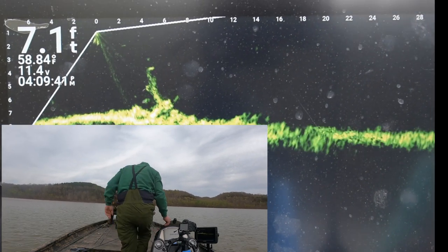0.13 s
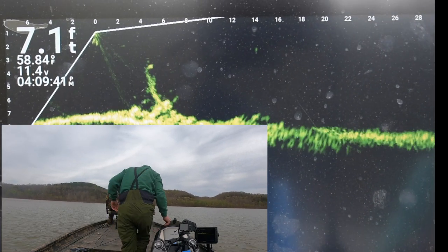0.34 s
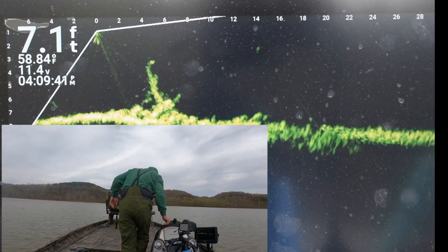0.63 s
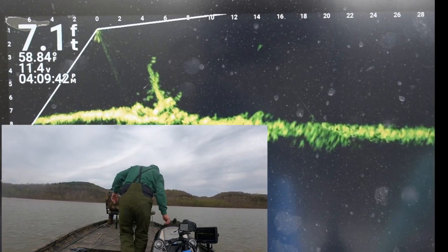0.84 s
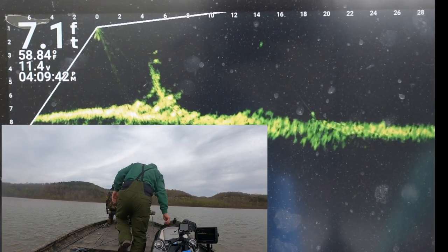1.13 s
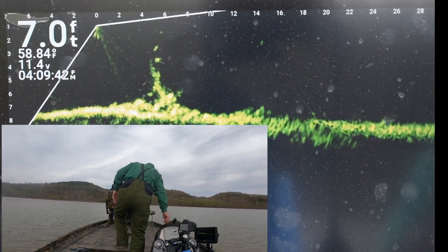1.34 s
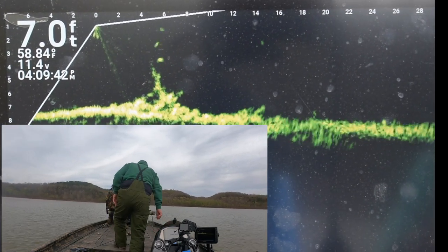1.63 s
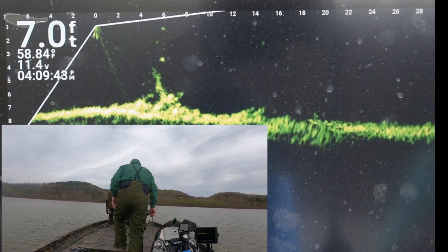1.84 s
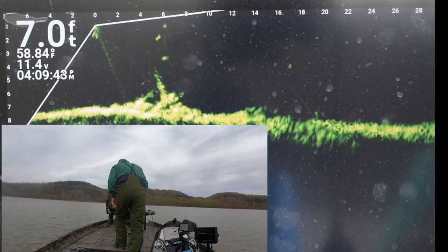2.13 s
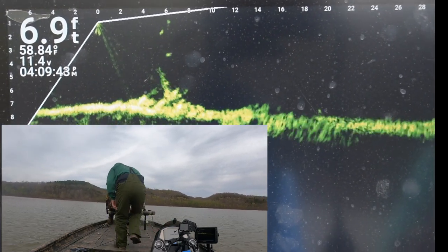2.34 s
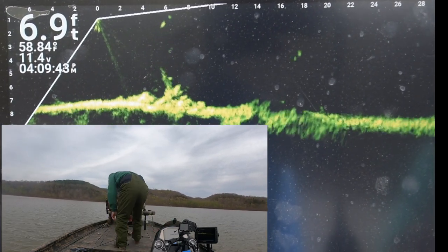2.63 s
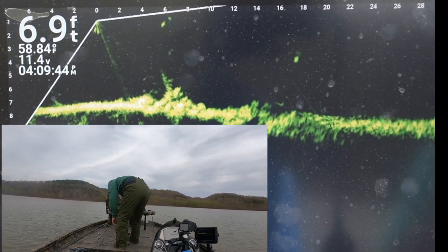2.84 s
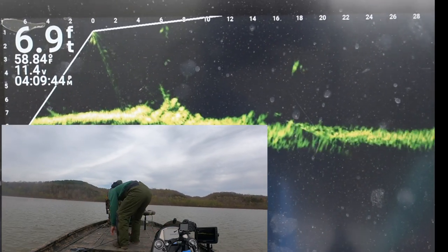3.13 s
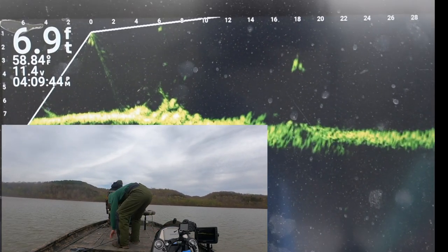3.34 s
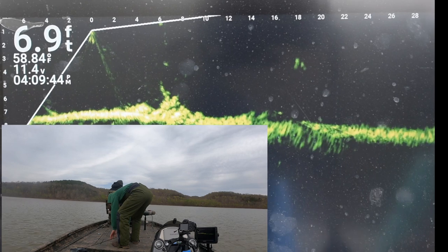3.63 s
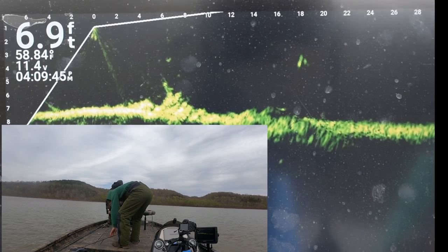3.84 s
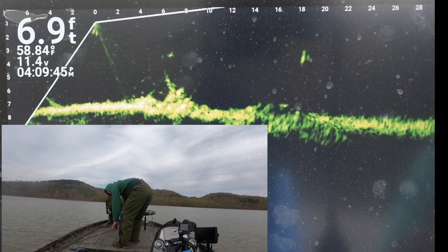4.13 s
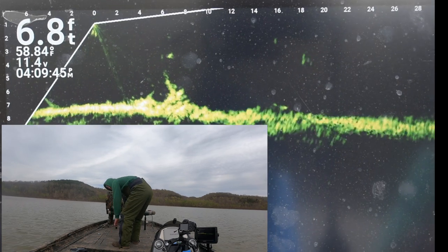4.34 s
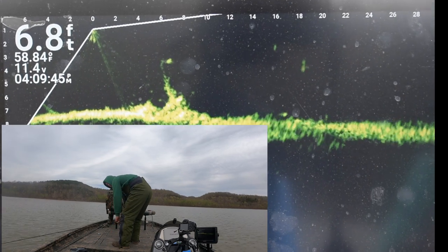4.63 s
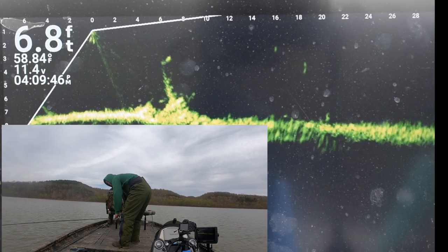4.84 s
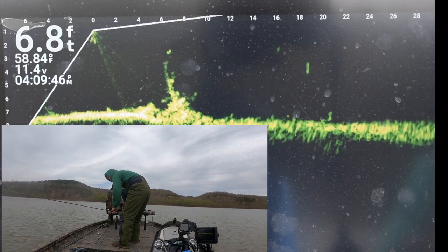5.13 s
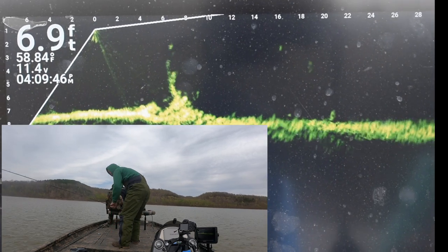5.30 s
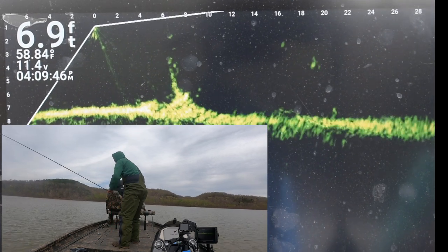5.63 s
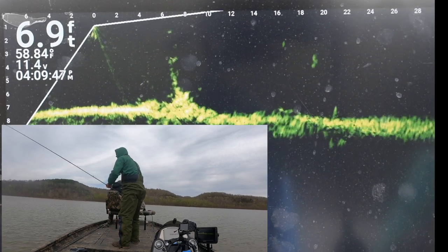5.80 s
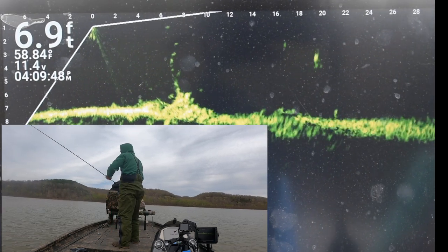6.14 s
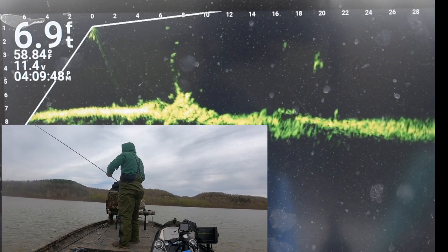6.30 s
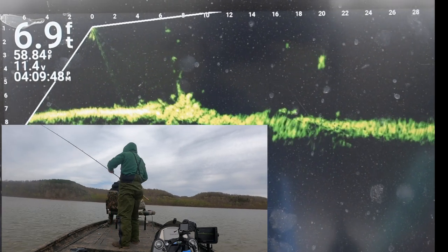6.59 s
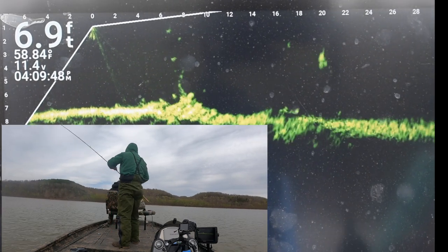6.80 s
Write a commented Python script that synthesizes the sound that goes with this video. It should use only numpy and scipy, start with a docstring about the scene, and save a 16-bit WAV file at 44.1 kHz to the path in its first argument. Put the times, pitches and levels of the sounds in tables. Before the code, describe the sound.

Irregular footsteps and handling on a boat deck, heard from a few steps behind. Early on there are solid hollow thuds, gritty scuffs, rattling gear and crisp swishes of rain clothes. After a loud step around 2.8 seconds the movement calms to sparse woody knocks and ticks, with light thumps returning late. Wind rumbles, flutters and puffs unevenly in low thuds on the microphone, slightly heavier on the left; water and hiss are barely audible.

```python
"""Boots thump the hollow deck of a small boat on a lake as an angler walks and rummages, the microphone behind him.
Shaped noise pushes ring deck, hull and hatch lids; bumpy scrapes through single resonances make tackle knock and tick.
Grainy noise strokes make rain gear rustle and blows click brightly; soles scuff and grit crackles under it.
Gusting wind buffets and flutters on the two ports; the lake lies wide and steady behind, over faint microphone hiss."""
import sys
import numpy as np
from scipy import signal
from scipy.fft import rfft, irfft
from scipy.io import wavfile
from scipy.ndimage import uniform_filter1d

SR = 44100
rng = np.random.default_rng(int(sys.argv[2]) if len(sys.argv) > 2 else 0)


def materialize(psi):
    """Save the field psi as 16-bit PCM at rate SR to the path in sys.argv[1].

    A 1-D psi becomes a single channel; in a 2-D psi each row is a channel.
    """
    bounded = np.clip(np.atleast_2d(psi).T, -1, 1)
    quanta = np.round(bounded * 32767).astype(np.int16)
    wavfile.write(sys.argv[1], SR, quanta)


N = 306936  # samples

# Boots on the deck: (time [s], thump level [dB], knock level [dB over thump], grit level [dB over thump],
# weight on the hull [dB over thump], contact [s], loudest panel [Hz])
STEPS = [(0.417, -15, -15, -23.5, -32, 0.021, 143), (0.464, -25, -40, -25, 11, 0.015, 120),
         (0.481, -30.5, 1.5, -2, -1, 0.012, 152), (0.71, -34, -6.5, -35, -12, 0.027, 432),
         (0.93, -25.5, -10, -7.5, -2.5, 0.015, 238), (1.089, -39.5, -24, -7, 2, 0.012, 253),
         (1.763, -15, -8.5, -24.5, -25, 0.012, 221), (1.939, -21, -5.5, -8.5, -15, 0.013, 250),
         (2.028, -41.5, -24, -12, 6, 0.0092, 123), (2.843, -13, -12.5, -18.5, -0.5, 0.018, 126),
         (5.643, -29, -12, -23, 0, 0.015, 247), (5.669, -35, -25, -35, -6, 0.018, 218),
         (6.171, -26.5, -24, -35, -12, 0.011, 176), (6.197, -33, -23, -40, 0, 0.015, 230),
         (6.414, -37, 1, -37, 8, 0.0084, 121), (6.722, -29, -25, -40, -4, 0.015, 252)]
# Ringing modes of deck panels, hull and hatch lids: (frequency [Hz], relative level [dB], t60 [s])
DECK_MODES = [(131, 6, 0.024), (149.4, -4.5, 0.13), (185, -7, 0.03), (225, 5, 0.079), (251.6, -6.5, 0.2),
              (320, -5, .045), (382, -1.5, 0.08), (458, -6.5, 0.078)]
HULL_MODES = [(45.4, -7, 0.3), (64.1, -4.5, 0.2), (77.2, -19, 0.5)]
HATCH_MODES = [(520, 9.5, 0.014), (616, 10, 0.022), (692, 2, 0.068), (902, 8, 0.019), (1048, 4, 0.039),
               (1248, 8, 0.014), (1510, 0, 0.043), (2150, -17, 0.011)]
# Sand crushed under the sole, noise spectrum: (frequency [Hz], relative level [dB per Hz])
GRIT_SPECTRUM = [(900, -7), (1500, 7), (2500, 9), (4000, 3), (5500, -11), (8000, -6.5), (10000, -20),
                 (15000, -34)]
PANEL_DB, PANEL_T60_S = 4.5, 0.074  # the panel right under the boot

# Lids, tackle, rods and snaps knocked; low rings are hollow, high ones tick:
# (time [s], level [dB], ring [Hz], width [octaves], contact [s])
GEAR = [(0.2556, -54, 1830, 1.3, 0.029), (0.2817, -47.5, 2820, 0.69, 0.016),
        (0.417, -40.5, 3300, 1.1, 0.012), (0.44, -35.5, 915, 1.7, 0.0091), (0.4811, -34, 3700, 0.6, 0.006),
        (0.672, -42, 437, 0.3, 0.052), (0.692, -37, 480, 1.2, 0.013), (0.714, -29.5, 403, 1.14, 0.0093),
        (0.753, -43, 404, 2.3, 0.018), (0.758, -44.5, 3020, 1, 0.0052), (0.7745, -40.5, 1780, 0.46, 0.012),
        (0.789, -43, 3860, 0.8, 0.0037), (0.803, -37.5, 510, 0.9, 0.012), (0.856, -35.5, 690, 0.56, 0.0057),
        (0.8754, -45, 2340, 0.36, 0.041), (0.9162, -31, 4200, 0.79, 0.0045),
        (0.917, -34.5, 1260, 1.2, 0.0094), (0.929, -24, 593, 0.71, 0.0054), (0.955, -45, 696, 1.4, 0.012),
        (1.054, -43.5, 1740, 0.52, 0.012), (1.055, -40.5, 3950, 0.49, 0.0054),
        (1.075, -35, 696, 0.85, 0.0091), (1.1608, -48, 1250, 0.86, 0.067), (1.2187, -41, 1470, 1.5, 0.017),
        (1.3441, -38, 1190, 0.84, 0.022), (1.3864, -49.5, 3198, 0.33, 0.0038),
        (1.744, -32.5, 640, 0.53, 0.015), (1.7986, -42, 1900, 0.46, 0.01), (1.799, -40, 606, 1.2, 0.028),
        (1.94, -30.5, 3670, 1.3, 0.0051), (1.9694, -42.5, 1580, 0.32, 0.006),
        (2.026, -44, 480, 0.57, 0.0072), (2.0804, -46.5, 1240, 0.8, 0.0054),
        (2.1665, -40, 1030, 0.88, 0.025), (2.2272, -43.5, 1330, 0.99, 0.085),
        (2.2475, -41, 3160, 1.3, 0.0033), (2.25, -39, 650, 1.5, 0.016), (2.322, -46, 630, 0.91, 0.026),
        (2.463, -38, 377, 0.82, 0.023), (2.49, -44, 430, 0.32, 0.0091), (2.6558, -44.5, 1320, 1.9, 0.013),
        (2.673, -42, 690, 1.4, 0.01), (2.6968, -43, 950, 1.6, 0.011), (2.6988, -34.5, 4270, 0.31, 0.0037),
        (2.748, -57, 5460, 1.6, 0.023), (2.8495, -26.5, 4870, 1.2, 0.0068),
        (2.879, -33.5, 382, 0.42, 0.016), (2.88, -32, 204.6, 0.36, 0.028), (2.955, -50, 5930, 0.38, 0.0089),
        (3.0046, -50.5, 1400, 0.96, 0.0054), (3.098, -43.5, 417, 2.1, 0.019),
        (3.102, -46, 2850, 1.7, 0.006), (3.119, -43.5, 2100, 0.55, 0.014), (3.286, -52.5, 1410, 1.4, 0.025),
        (3.338, -38, 1510, 0.45, 0.014), (3.543, -37, 1098, 0.34, 0.016), (3.7216, -40, 1490, 0.86, 0.024),
        (3.7803, -57.5, 2000, 2.4, 0.015), (3.841, -42, 3870, 1.7, 0.0084),
        (3.842, -41.5, 1130, 1.6, 0.023), (3.86, -50, 1870, 0.9, 0.024), (3.8783, -43, 1700, 0.27, 0.0066),
        (3.909, -44, 1040, 0.49, 0.0087), (3.917, -40, 445, 0.54, 0.018), (4.0644, -42, 1770, 0.56, 0.014),
        (4.235, -50, 1180, 0.59, 0.018), (4.3685, -65, 4180, 0.46, 0.012), (4.393, -36, 556, 0.64, 0.038),
        (4.4109, -45, 1570, 0.71, 0.029), (4.444, -37, 610, 0.84, 0.023), (4.45, -54, 2700, 0.38, 0.0095),
        (4.4965, -40.5, 1430, 0.38, 0.015), (4.69, -61, 6500, 0.71, 0.022), (4.715, -41, 797, 0.64, 0.024),
        (5.087, -52, 995, 0.12, 0.025), (5.1532, -55.5, 3400, 0.77, 0.016),
        (5.1546, -51.5, 1570, 0.51, 0.02), (5.252, -55, 1750, 0.24, 0.016),
        (5.3325, -51.5, 5940, 0.83, 0.011), (5.3359, -38.5, 1550, 0.6, 0.011),
        (5.4137, -52.5, 6250, 0.56, 0.015), (5.6391, -52.5, 2550, 0.23, 0.012),
        (5.643, -49, 980, 1.1, 0.011), (5.646, -38, 387, 0.24, 0.027), (5.679, -45, 392, 0.41, 0.014),
        (5.6905, -52, 1650, 0.29, 0.027), (5.7116, -47, 1320, 0.6, 0.014), (5.7124, -51, 3240, 0.34, 0.015),
        (5.869, -58.5, 6260, 0.71, 0.016), (5.889, -50, 2110, 0.52, 0.026),
        (5.9374, -36.5, 993, 1.1, 0.016), (5.9375, -45, 2500, 1.6, 0.015),
        (5.9488, -41.5, 1250, 0.31, 0.015), (5.959, -38.5, 667, 1.1, 0.013),
        (6.0157, -61.5, 5060, 0.87, 0.0089), (6.1327, -48.5, 1100, 0.56, 0.038),
        (6.162, -36.5, 1610, 0.43, 0.011), (6.189, -51, 400, 0.37, 0.015),
        (6.1897, -53.5, 1640, 0.44, 0.026), (6.3257, -51, 1280, 0.66, 0.018),
        (6.3295, -52.5, 2970, 1, 0.022), (6.344, -47.5, 2040, 0.38, 0.028),
        (6.3897, -50, 4080, 0.43, 0.019), (6.4133, -57, 980, 0.35, 0.019), (6.416, -35.5, 520, 0.76, 0.029),
        (6.479, -51, 432, 0.96, 0.025), (6.481, -53.5, 1940, 0.16, 0.01), (6.71, -32, 622, 0.66, 0.016),
        (6.7101, -52, 4540, 1, 0.0084), (6.729, -40.5, 460, 1.3, 0.035), (6.7417, -48, 1280, 0.9, 0.022),
        (6.755, -56, 2260, 0.64, 0.018), (6.8332, -50.5, 1110, 1.8, 0.0078),
        (6.872, -56, 2830, 0.98, 0.029), (6.907, -50, 2700, 0.27, 0.01), (6.91, -45, 1840, 1, 0.0098),
        (6.9297, -50, 1680, 0.36, 0.017), (6.945, -38, 715, 0.41, 0.0096)]
GEAR_RISE = 0.091  # share of the contact
GEAR_TAIL, GEAR_CORE = 0.26, 1.16  # scattered tail and narrow ringing core, gains beside the scrape
CRACK_DB, CRACK_S = -30, 0.0015  # broad click at first touch: dB over the blow, fall time constant
GEAR_PAN_DB, GEAR_PAN_SPREAD_DB = -0.5, 1.5  # left over right
BUMPY = 0.45  # exponent: how unevenly a scrape catches
STRAYS_PER_S = 12
STRAY_DB, STRAY_SPREAD_DB = 5, 3.0  # mean in dB over the scuffing level, and spread
STRAY_HZ, STRAY_OCTAVES = 1300, 0.45  # middle ring and its spread

# Strokes of rain gear, and short bright clicks where boots and gear strike:
# (start [s], rise [s], hold [s], fall [s], rustle level [dB], sheen level [dB over rustle])
STROKES_AND_CLICKS = [(-.1, 0.13, .13, .09, -48.5, -6), (.12, 0.095, 0.018, 0.01, -54, -1.5),
                      (0.222, 0.028, 0.045, 0.42, -69, -7), (0.4, 0.015, 0.008, 0.055, -50, -6.5),
                      (0.469, .008, .005, .04, -58, -1), (0.535, 0.25, .29, 0.11, -53.5, -4.5),
                      (0.867, 0.055, 0.0083, 0.14, -47, -6), (1.05, .25, .1, 0.4, -57.5, -6),
                      (1.747, 0.0063, 0.0081, 0.22, -57, -18), (1.793, 0.041, .05, 0.42, -68.5, -4),
                      (1.916, 0.27, .005, 0.14, -56.5, -10.5), (2.19, 0.053, .06, 0.22, -49.5, -8),
                      (2.354, 0.11, 0.085, .12, -51, -6.5), (2.615, 0.08, 0.015, .03, -55, -6),
                      (2.84, .008, 0.0032, 0.063, -38, -16), (2.927, 0.14, .3, .35, -64.5, -7.5),
                      (3.832, .008, .015, 0.072, -58.5, -9), (3.857, 0.12, 0.34, 0.54, -74.5, -5.5),
                      (4.55, 0.066, .06, 0.061, -82, -8), (5.144, 0.007, 0.0079, 0.036, -63, -30),
                      (5.15, 0.16, .12, .15, -67.5, -1), (5.55, 0.16, .02, .15, -66.5, -23),
                      (5.855, 0.01, 0.0042, .05, -68, -23), (5.928, .015, 0.0046, 0.073, -70, -30),
                      (6.202, 0.057, 0.017, 0.066, -70, -25), (6.305, 0.026, 0.055, 0.11, -67, -28),
                      (6.704, 0.055, .01, .05, -69, -29), (6.79, 0.051, .02, .08, -73, -27)]
STROKE_SPAN_DB = 21  # level change over one rise or fall time
REST_DB, REST_SHEEN_DB = -84, -16.5  # cloth at rest; its sheen over rustle
# Soles and folds scuffing: (time [s], level [dB])
SHUFFLE = [(0.0, -61.5), (0.5, -72), (0.73, -65), (0.9, -48), (1.0, -55.5), (1.57, -68), (1.8, -74),
           (2.02, -59.5), (2.38, -55.5), (2.66, -60), (2.89, -70.5), (3.2, -62), (3.75, -66), (3.89, -57.5),
           (4.0, -68), (4.81, -69.5), (5.6, -66.5), (5.84, -63), (6.24, -67), (6.4, -61.5), (6.73, -71),
           (6.96, -55.5)]
# Rustle body, its treble sheen, scuffing and crackling grit, noise spectra:
# (frequency [Hz], relative level [dB per Hz])
RUSTLE_SPECTRUM = [(900, 0.5), (1600, -1.5), (2600, 1.5), (4200, 1), (5600, 1), (7500, -0.5), (9500, -11),
                   (12000, -35)]
SHEEN_SPECTRUM = [(7500, -29), (9500, -13), (12000, -10.5), (14000, -10.5), (15500, -32)]
SCUFF_SPECTRUM = [(250, -1), (420, 4.5), (680, 0.5), (800, -4), (1300, -4.5), (2000, -14.5), (3200, -50.5)]
CRACKLE_SPECTRUM = [(500, -20.5), (1000, -3), (2000, 7), (3500, -17), (5500, -7.5), (8000, -29)]

# Gusting wind on the microphone ports: (time [s], buffet level [dB], flutter level [dB])
WIND = [(0, -45, -54.5), (.3, -35, -45.5), (.65, -39, -51), (.9, -33.5, -47), (1.2, -43, -52),
        (1.55, -46, -53.5), (2.05, -40.5, -46.5), (2.45, -38, -48), (2.75, -32, -44), (3.0, -33.5, -47.5),
        (3.45, -40, -49), (3.75, -31, -46), (4.0, -43, -53.5), (4.3, -37.5, -49), (4.9, -35, -49.5),
        (5.35, -42, -53), (5.7, -30.5, -46.5), (6.0, -35, -51), (6.4, -33, -49), (6.7, -37.5, -54),
        (6.96, -39, -46.5)]
# Puffs that thud on the ports: (time [s], nominal level [dB], swell half-length [s])
PUFFS = [(0.075, -36, 0.034), (0.21, -35.5, 0.064), (0.349, -27, .03), (.485, -20.5, 0.024),
         (0.568, -35.5, 0.027), (1.393, -41, 0.057), (2.304, -34, 0.055), (2.575, -23.5, 0.048),
         (2.7, -19.5, 0.024), (3.235, -28, 0.039), (3.576, -25, 0.024), (3.784, -35, 0.015),
         (4.16, -31.5, 0.039), (4.27, -31, 0.014), (4.523, -27, 0.018), (4.619, -35.5, 0.014),
         (4.697, -31.5, 0.017), (4.825, -33.5, 0.034), (5.029, -26.5, 0.045), (5.172, -24.5, 0.032),
         (5.592, -32, 0.029), (5.722, -34, 0.032), (6.238, -29.5, 0.021), (6.51, -27, 0.053),
         (6.601, -29, 0.018)]
# Low buffeting and the flutter above it, noise spectra: (frequency [Hz], relative level [dB per Hz])
BUFFET_SPECTRUM = [(15, -2), (25, 7), (50, 0.5), (70, -3), (100, -14.5), (160, -23)]
FLUTTER_SPECTRUM = [(70, -2.5), (110, 3), (180, -5), (300, -14.5), (500, -30.5), (800, -60.5)]
PUFF_FLUTTER_DB = -29  # over the puff's nominal level
WIND_PAN_DB, WIND_PAN_SWAY_DB = -5, 2  # left over right

# Open lake and microphone hiss, noise spectra: (frequency [Hz], relative level [dB per Hz])
LAKE_SPECTRUM = [(150, -14), (300, -4.5), (600, -4), (1300, -8.5), (2000, -20), (3500, -26.5), (5000, -36)]
HISS_SPECTRUM = [(1500, 1.5), (2500, -8), (3800, -8), (5000, 3.5), (8000, 3), (9500, -15), (15000, -25)]
MIC_HZ, TOP_HZ = 8060, 15100  # housing's treble corner, camera's upper limit


def undb(db):
    """dB to gain."""
    return 10 ** (np.asarray(db) / 20)


def colour(x, spectrum):
    """Noise given a (Hz, dB) spectrum, rms 1."""
    hz, db = np.transpose(spectrum)
    f = np.maximum(np.fft.rfftfreq(x.shape[-1], 1 / SR), 1)
    gain = undb(np.interp(np.log(f), np.log(hz), db, left=-80, right=-80))
    y = irfft(rfft(x) * gain, x.shape[-1])
    return y / np.sqrt(np.mean(y ** 2))


def walk(rate):
    """Random levels held 1 / rate s and slewed twice; spread 1."""
    hold = int(SR / rate)
    levels = np.repeat(rng.standard_normal(N // hold + 1), hold)
    levels = uniform_filter1d(uniform_filter1d(levels, hold), hold)[:N]
    return levels / levels.std()


def curve(table):
    """Columns of a curve table, one value a sample."""
    s, *columns = np.transpose(table)
    return [np.interp(np.arange(N) / SR, s, column) for column in columns]


def pair(spectrum, alike, grain_db=0):
    """Stereo noise, grainy if asked; alike 1 = same left and right."""
    sizes = undb(grain_db * np.minimum(rng.exponential(size=N), 7))
    mid = colour(sizes * rng.standard_normal(N), spectrum)
    side = colour(sizes * rng.standard_normal(N), spectrum)
    alike = np.clip(alike, 0, 1)
    opposed = side * np.array([[1], [-1]])
    return (np.sqrt(1 + alike) * mid + np.sqrt(1 - alike) * opposed) / np.sqrt(2)


def ring(push, modes, shift):
    """A push through (Hz, dB, t60) modes, each shifted by where the blow lands; peak 1."""
    y = 0
    for (hz, db, t60), move in zip(modes, shift):
        decay = np.log(1000) / (max(t60, .005) * SR)
        pole = np.exp(2j * np.pi * hz * move / SR - decay)
        y = y + undb(db) * signal.lfilter([1], [1, -pole], push).imag
    return y / np.max(np.abs(y))


def fade(size, contact, rise):
    """Quick rise, then a fall with time constant contact s."""
    t = np.arange(size) / SR
    return (1 - np.exp(-t / rise)) ** 2 * np.exp(-t / max(contact, .001))


def add(out, x, s, pan_db):
    """Mix a sound in at s, pan_db louder on the left than on the right."""
    i = max(int(s * SR), 0)
    x = x[..., :N - i]
    out[:, i:i + x.shape[-1]] += x * undb(np.array([[pan_db], [-pan_db]]) / 2)


def steps():
    """A rough rubber sole rings hull, deck and hatch lids; grit crunches and trails off, scattered left and right."""
    out = np.zeros((2, N))
    noise = rng.standard_normal((len(STEPS), 4, SR // 2))
    shifts = np.exp(.05 * rng.standard_normal((len(STEPS), len(DECK_MODES))))
    soft = signal.butter(2, 2500, fs=SR, output="sos")
    for row, (sole, *sand), shift in zip(STEPS, noise, shifts):
        s, db, knock_db, grit_db, weight_db, contact, panel_hz = row
        size = len(sole)
        press = fade(size, contact, 0.0017) + 0.2 * fade(size, 2.5 * contact, 0.0055)
        push = signal.sosfilt(soft, sole * press)
        sand = colour(np.array(sand), GRIT_SPECTRUM)
        crunch = sand[0] * fade(size, 0.41 * contact, 0.0041)
        trail = 0.29 * (sand[0] + sand[1:]) * fade(size, 1.12 * contact, 0.0035)
        # panels tuned far from the one underfoot ring less
        panels = [(hz, gain_db - 7 * abs(np.log2(hz / panel_hz)), t60) for hz, gain_db, t60 in DECK_MODES]
        panels.append((panel_hz, PANEL_DB, PANEL_T60_S))
        thump = ring(push, panels, [*shift, 1])
        weight = undb(weight_db) * ring(push, HULL_MODES, shift)
        knock = undb(knock_db) * ring(push, HATCH_MODES, shift)
        grit = undb(grit_db) * (crunch + trail)
        add(out, undb(db) * (thump + weight + knock + grit), s - .003, -1.0)
    return out


def rattles(table):
    """A bumpy scrape in one damped resonance with a narrower core; nearby gear scatters a tail, unlike left and right."""
    out = np.zeros((2, N))
    noise = rng.standard_normal((len(table), 3, SR // 5))
    catches = rng.exponential(size=(len(table), SR // 5 // 60))
    bumps = .3 + np.repeat(catches, 60, axis=1) ** BUMPY  # each catch lasts 60 samples
    for (s, db, hz, width, contact), scrape, bump in zip(table, noise, bumps):
        size = scrape.shape[1]
        blow = scrape[0] * fade(size, contact, GEAR_RISE * contact)
        tail = GEAR_TAIL * scrape[1:] * fade(size, 2.27 * contact, 0.0043)
        push = bump * (blow + tail)
        y = 0
        for share, octaves in ((1, width), (GEAR_CORE, width / 4)):
            edges = hz * 2 ** (np.clip(octaves, .02, 3) * np.array([-.5, .5]))
            edges = np.clip(edges, [50, 60], [.44 * SR, .45 * SR])
            band = signal.butter(2, edges, "bandpass", fs=SR, output="sos")
            y = y + share * signal.sosfilt(band, push)
        # level sets the energy relative to the contact time
        knock = undb(db) * y / np.sqrt(2 * np.sum(y ** 2) / (contact * SR))
        crack = undb(db + CRACK_DB) * np.diff(scrape[0], prepend=0) * fade(size, CRACK_S, 0.00041)
        pan_db = GEAR_PAN_DB + GEAR_PAN_SPREAD_DB * rng.standard_normal()
        add(out, knock, s - .002, pan_db)
        add(out, crack, s - .002, pan_db)
    return out


def strays():
    """Rows like those of GEAR, faint and at random moments, louder while the feet shuffle."""
    count = int(STRAYS_PER_S * N / SR)
    times = rng.random(count) * N / SR
    level, pitch = rng.standard_normal((count, 2)).T
    levels_db = np.interp(times, *np.transpose(SHUFFLE)) + STRAY_DB + STRAY_SPREAD_DB * level
    rings_hz = STRAY_HZ * 2 ** (STRAY_OCTAVES * pitch)
    return [(s, db, hz, .7, .011) for s, db, hz in zip(times, levels_db, rings_hz)]


def strokes_and_clicks():
    """Gains of rustle and sheen: each stroke or click rises, holds and falls at an even dB pace."""
    t = np.arange(N) / SR
    rustle, sheen = undb(REST_DB) ** 2, undb(REST_DB + REST_SHEEN_DB) ** 2  # powers
    for s, rise, hold, fall, db, sheen_db in STROKES_AND_CLICKS:
        before = (s + rise - t) / rise
        after = (t - s - rise - hold) / fall
        below = np.maximum(np.maximum(before, after), 0)
        power = undb(db - STROKE_SPAN_DB * below) ** 2
        rustle, sheen = rustle + power, sheen + power * undb(sheen_db) ** 2
    return np.sqrt(rustle), np.sqrt(sheen)


def rubbing():
    """Coated cloth hisses in fine grains and blows click in them; soles and folds scuff, loose grit crackles in bursts."""
    rustle, sheen = strokes_and_clicks()
    scuff_db = curve(SHUFFLE)[0]
    bright = rustle * undb(2.27 * walk(40)) * pair(RUSTLE_SPECTRUM, 1.0, grain_db=3.0)
    bright = bright + sheen * undb(1.3 * walk(45)) * pair(SHEEN_SPECTRUM, 0.67, grain_db=3.0)
    scuff = pair(SCUFF_SPECTRUM, 0.95, grain_db=3.5) * undb(3.5 * walk(30))
    grains = (rng.random(N) < 70 / SR) * rng.exponential(size=N)  # about 70 a second
    bursts = signal.lfilter([1], [1, -np.exp(-1 / (.004 * SR))], grains)  # each dies with a 4 ms time constant
    grit = undb(-13.0) * bursts * pair(CRACKLE_SPECTRUM, 0.46)
    return bright + (scuff + grit) * undb(scuff_db)


def wind():
    """Gusts press on the two ports, partly unlike, and flutter above the buffeting; puffs swell and sink evenly."""
    t = np.arange(N) / SR
    buffet_db, flutter_db = curve(WIND)
    air, thuds, swells = pair(BUFFET_SPECTRUM, 0.66), 0, 0
    for s, db, length in PUFFS:
        swell = np.exp(-((t - s) / length) ** 2)
        # each puff keeps its strength whatever the noise does under it
        evened = np.sqrt(np.sum(swell ** 2) / np.sum((swell * air) ** 2) * 2)
        thuds = thuds + undb(db) * evened * swell
        swells = swells + undb(db) * swell
    pan_db = WIND_PAN_DB + WIND_PAN_SWAY_DB * walk(17)
    pan = undb(np.array([pan_db, -pan_db]) / 2)
    buffet = air * (undb(buffet_db + 1.5 * walk(14)) + thuds) * pan
    flutter_gain = undb(flutter_db + 2.66 * walk(20)) + undb(PUFF_FLUTTER_DB) * swells
    return buffet + pair(FLUTTER_SPECTRUM, 0.9) * flutter_gain


def lake():
    """Ripples and far air all round: steady and wide."""
    return pair(LAKE_SPECTRUM, 0.093) * undb(-68.0 + 0.98 * walk(18))


def hiss():
    """The microphone's own faint noise, slightly wavering."""
    return undb(-80.5 + 1.8 * walk(12)) * pair(HISS_SPECTRUM, .3)


def scene():
    """All sources together, from the boots out to the lake, over the microphone's hiss."""
    return steps() + rattles(GEAR) + rattles(strays()) + rubbing() + wind() + lake() + hiss()


def record(dry):
    """The housed microphone dulls the treble and the camera cuts the top."""
    housed = signal.sosfilt(signal.butter(2, MIC_HZ, fs=SR, output="sos"), dry)
    return signal.sosfilt(signal.ellip(8, .2, 70, TOP_HZ, fs=SR, output="sos"), housed)


dry = scene()
out = record(dry)
materialize(out)
```